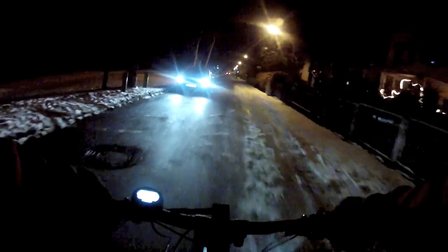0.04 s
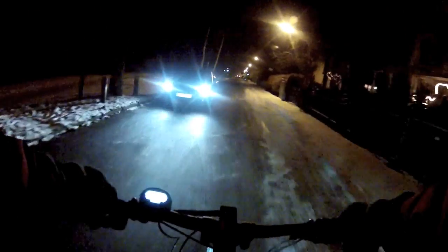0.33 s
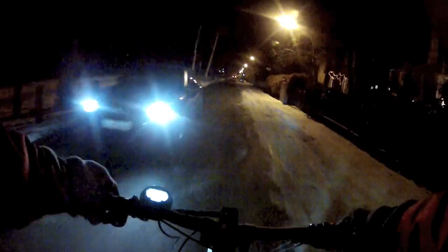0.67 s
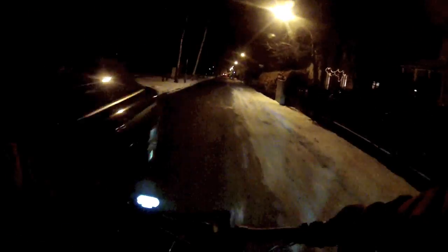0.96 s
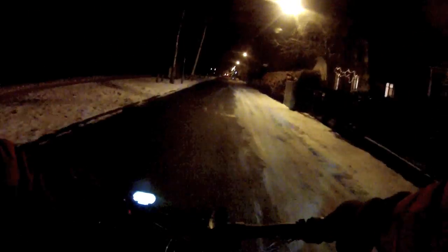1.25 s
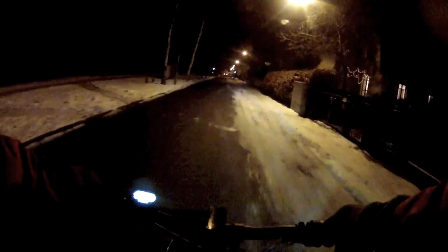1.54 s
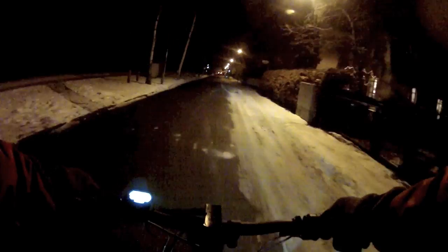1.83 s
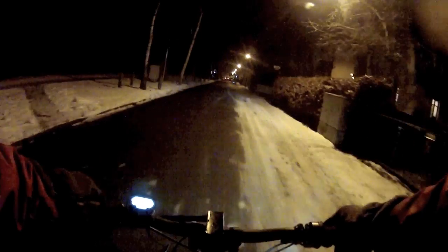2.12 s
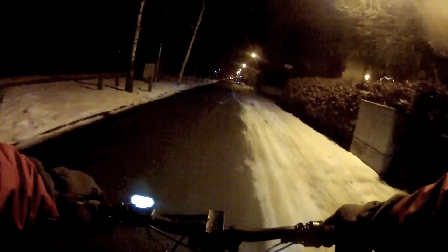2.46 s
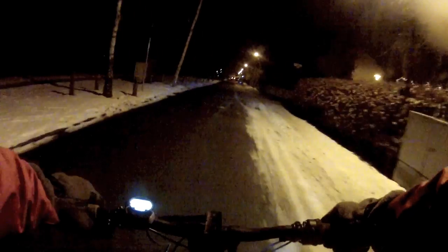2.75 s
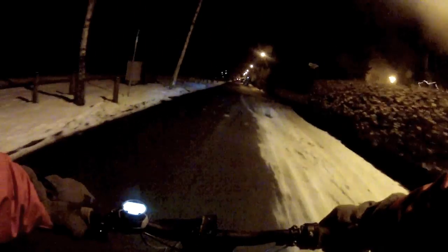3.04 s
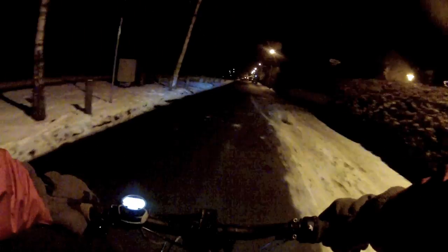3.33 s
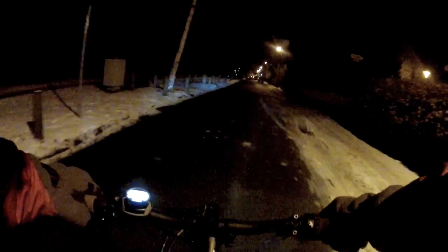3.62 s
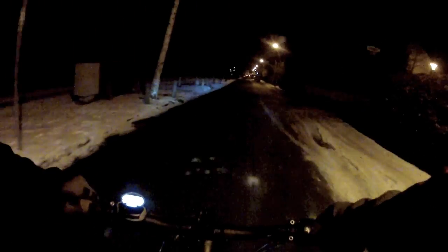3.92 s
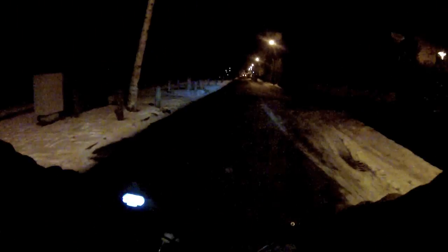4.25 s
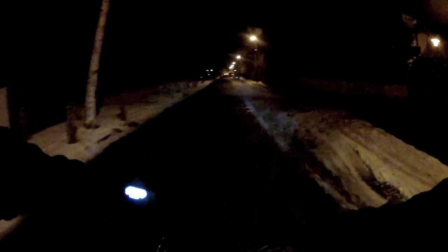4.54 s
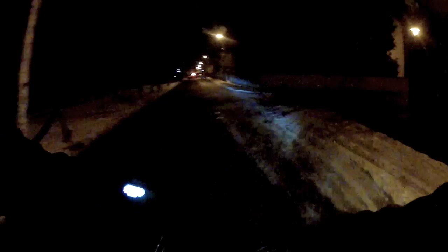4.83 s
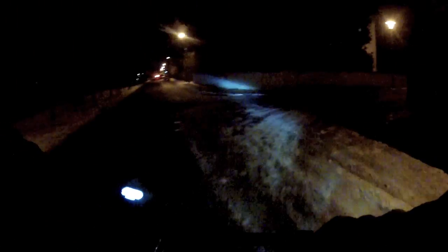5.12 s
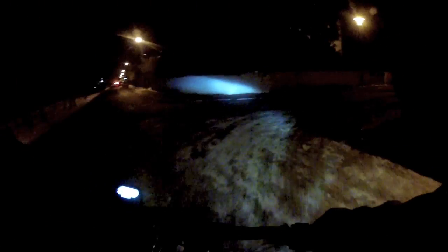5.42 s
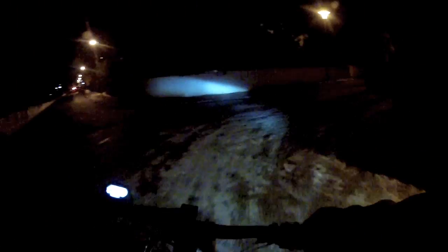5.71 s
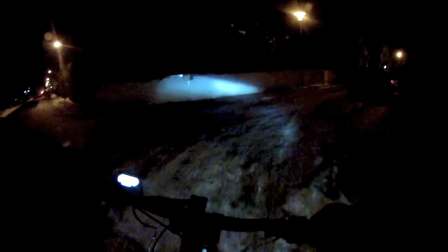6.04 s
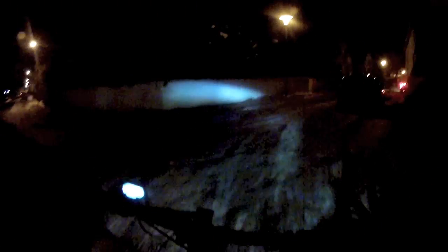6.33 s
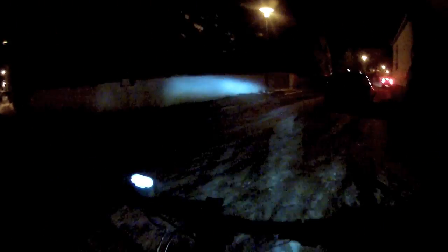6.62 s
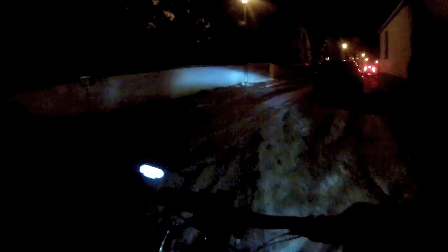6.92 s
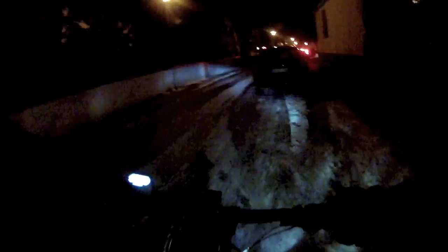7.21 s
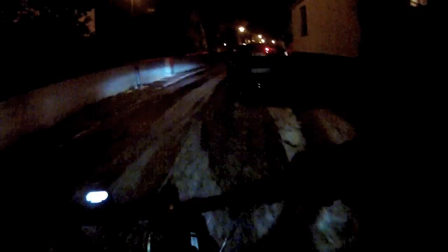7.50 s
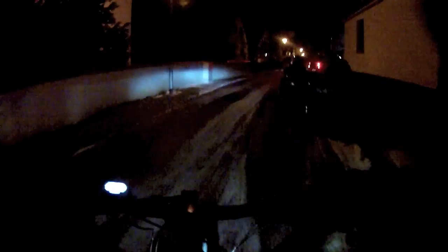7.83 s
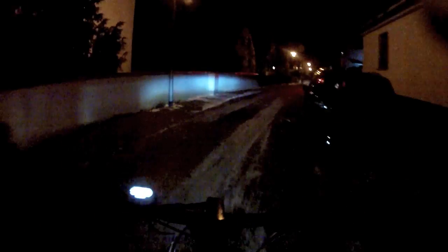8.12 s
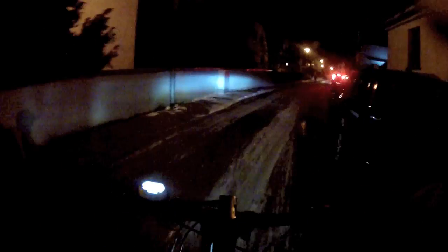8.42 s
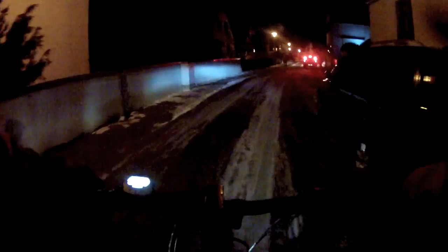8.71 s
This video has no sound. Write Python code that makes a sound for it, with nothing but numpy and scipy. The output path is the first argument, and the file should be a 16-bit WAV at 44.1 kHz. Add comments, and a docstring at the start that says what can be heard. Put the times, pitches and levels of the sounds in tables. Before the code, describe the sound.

From the start, studded bicycle tyres crackle close to the microphone on asphalt: fine bright ticks and irregular sharp snaps over a hollow rolling rush. Low wind buffets the microphone, gusting near 0.7 and 1.6 seconds, then easing. An oncoming car's tyre roar swells, peaks at about 1 second and falls away; its low engine drone follows, rises slightly in pitch and fades by about 4.5 seconds. Brief stud skids are scattered throughout. Around 5.5 to 7 seconds the bicycle slows onto ice, the snaps thin out and the crackle becomes a quieter, denser crunch. Frozen ruts knock dully against the tyres from 6 to 8 seconds, hardest after 7.3 seconds, where another gust comes. The tread hums briefly near 8.5 seconds, and a dull rumble wells up at about 8.8 seconds. A thin glassy fizz lies over the whole sound.

```python
"""A winter road: a bicycle on studded tyres rolls over asphalt, then slows onto rutted ice.
The studs crackle, snap and skid over the hollow rush of the tyres, and frozen ruts knock against them.
An oncoming car roars past in the first second and drones away. Wind buffets the microphone,
and a dull rumble wells up at the very end. A coarse sample-and-hold lays a glassy fizz over it all."""
import sys
import numpy as np
from scipy import signal
from scipy.fft import rfft, irfft
from scipy.io import wavfile

SR = 44100
rng = np.random.default_rng(int(sys.argv[2]) if len(sys.argv) > 2 else 0)


def output_pcm(signal):
    """Save a mono or channel-first signal as 16-bit PCM at the path in sys.argv[1].

    Samples are clipped to [-1, 1] before scaling.
    """
    pcm = np.clip(np.atleast_2d(signal).T, -1, 1) * 32767
    wavfile.write(sys.argv[1], SR, np.round(pcm).astype(np.int16))


N = 390726
TIME = np.arange(N) / SR
HOLD_HZ = 8000  # rate of the sample-and-hold

# The wind bed, easing as the bicycle slows. Each row: time in seconds, level in dB before gusts.
WIND_LEVEL = [(0, -32.5), (2.2, -37), (3.9, -38), (5, -44), (6.7, -45.5), (8.86, -42)]
# Gusts on top of that bed. Each row: centre in seconds, lift in dB.
WIND_GUSTS = [(0, 1.5), (.7, 4.5), (1.602, 5), (2.88, 1), (7.3, 5)]
# The car's engine picks up and eases off. Each row: time in seconds, firing rate in Hz.
ENGINE_FIRING = [(1.3, 54.76), (2.03, 55.44), (2.42, 65.75), (2.65, 64.8), (2.9, 68), (3.2, 64.8),
                 (3.6, 63.35), (4.15, 59.3)]
# How much of the road is ice. Each row: time in seconds, share from 0 to 1.
ICE_SHARE = [(0, 0), (5.2, 0.13), (5.9, 0.22), (6.8, 0.88), (7.9, 0.88), (8.8, 0.63)]
# Frozen ruts. Each row: time in seconds, relative knock peak in dB, relative shudder level in dB.
RUT_HITS = [(5.96, -24, -34), (6.17, -26, -33), (6.307, -19.5, -34.5), (6.535, -21, -34.5),
            (6.591, -16.5, -33.5), (6.984, -20, -33), (7.324, -15, -30), (7.478, -17, -42),
            (7.569, -13, -31.5), (7.721, -10.5, -40), (7.784, -15.5, -38), (7.937, -14, -32),
            (7.968, -21, -33)]
# How hard the road works the studs. Each row: time in seconds, relative crackle level in dB.
CRACKLE_LEVEL = [(0, -34), (.85, -36), (1.02, -32), (1.35, -35), (2.3, -35), (2.55, -33.5), (3.4, -33),
                 (4.05, -37), (4.4, -35.5), (5.2, -36.5), (5.6, -42), (6, -42), (6.55, -44.5),
                 (7.25, -33.5), (7.45, -38), (7.9, -39.5), (8.25, -44.5), (8.86, -42)]
# Short slides of a stud. Each row: start in seconds, length in seconds, relative level in dB.
STUD_SKIDS = [(1.609, 0.028, -25.5), (2.469, 0.037, -35), (3.328, 0.033, -30), (4.449, 0.052, -28.5),
              (5.72, .04, -34.5), (6.026, 0.021, -35), (6.289, 0.033, -35), (6.834, 0.11, -39),
              (7.028, 0.013, -29.5), (7.171, 0.017, -27), (7.8, 0.029, -35), (7.872, 0.034, -35.5),
              (8.159, 0.04, -41.5)]
# The loudest snaps on stone. Each row: start in seconds, relative attack level in dB, brightness in dB.
STUD_SNAPS = [(.0257, -20.5, 0), (.152, -20, -8), (.161, -20, -2), (0.2468, -23, -5), (0.3968, -21.5, 2),
              (0.5474, -20.5, 0), (.758, -21.5, 5), (.86, -21, 3), (1.02, -25, 10), (1.0249, -18, 2),
              (1.034, -24.5, 10), (1.1716, -22, 10), (1.478, -21.5, -1), (1.5807, -19.5, 3),
              (1.659, -18.5, -1), (1.817, -19, -5), (1.8223, -22.5, -1), (1.92, -17.5, 1.5),
              (1.9748, -19, -5), (2.2362, -21.5, 2), (2.4738, -28, 6), (2.5871, -23, 0), (2.6074, -23, 3),
              (2.8969, -22, 5), (2.9214, -21.5, -2), (2.976, -13, -2), (3.3164, -23, 15), (3.5216, -25, 9),
              (3.7005, -22, 8), (4.2951, -24, -2), (4.3629, -24, -2), (4.402, -21, 3), (4.596, -18.8, 3),
              (4.673, -23, -2), (5.068, -19, 3), (5.1355, -25, 2), (5.1863, -27.5, -2), (5.3027, -24.5, 3),
              (5.3569, -26.5, 5), (5.411, -26, 4), (5.4946, -24, 2), (5.5405, -26, 4), (5.7145, -24, -6.5),
              (6.311, -33.5, -22), (7.4454, -19, -17), (7.4597, -24, -7), (8.1728, -30.5, -14)]

# The tone colour of each source. Each row: frequency in Hz, relative level in dB.
WIND_COLOUR = [(10, -33), (28, -1), (50, -0.5), (110, -2), (180, -6), (300, -5.5), (600, -49), (2000, -78)]  # deep buffeting
CAR_COLOUR = [(40, -16), (150, -2), (230, 1.5), (400, -2), (520, -1), (700, -2), (900, -13.5), (1200, -16),
              (1700, -14), (3000, -14), (4000, -24.5)]  # the car's road roar
TYRE_ASPHALT_COLOUR = [(40, -6), (170, -14.5), (245, -9), (288, 1.5), (338, 1.5), (385, -8), (450, -8),
                       (520, -6.5), (605, -4.5), (720, -9), (850, -18), (1100, -28), (2000, -33),
                       (4000, -27.5)]  # the bicycle tyres' hollow rush
TYRE_ICE_COLOUR = [(40, -14.5), (170, -14), (245, -6.5), (305, 0.5), (365, -5.5), (440, -10.5), (520, -2.5),
                   (585, 0), (640, -4.5), (720, -5.5), (850, -17.5), (1100, -21.5), (2000, -20.5),
                   (4000, -61)]  # on ice their upper resonance comes forward
STUD_ASPHALT_COLOUR = [(150, -12), (620, -3), (1050, -13), (1550, -8), (2010, 4.5), (2180, -2), (2320, 4),
                       (2480, -6.5), (2690, 5), (2830, 2), (3000, 6.5), (3270, -5.5), (3750, -3),
                       (4000, -9.5)]  # a bright tick
STUD_ICE_COLOUR = [(150, -12.5), (620, 4.5), (1000, -7.5), (1550, -10.5), (1970, 1.5), (2300, 0.5),
                   (2600, -6), (2900, 3.5), (3100, -5), (3350, -5.5), (3700, -28), (4000, -9)]  # a fuller crunch


def gain_of(db):
    """Decibels to amplitude."""
    return 10 ** (np.asarray(db) / 20)


def unit_rms(x):
    """Scales to rms 1."""
    return x / np.sqrt(np.mean(x ** 2) + 1e-20)


def curve(rows):
    """A table of times and values, drawn out to every sample."""
    return np.interp(TIME, *np.transpose(rows))


def colour_db(colour, hz):
    """A tone colour's level at the given frequencies."""
    corner_hz, db = np.transpose(colour)
    return np.interp(np.log(hz + 1), np.log(corner_hz + 1), db)


def add(mix, start_s, sound):
    """Drops a sound into the mix."""
    part = mix[max(round(start_s * SR), 0):][:len(sound)]
    part += sound[:len(part)]


def swell(centre_s, width_s):
    """A smooth hump of height 1."""
    return np.exp(-.5 * ((TIME - centre_s) / width_s) ** 2)


def noise(colour):
    """Coloured noise of rms 1."""
    shape = gain_of(colour_db(colour, np.fft.rfftfreq(N, 1 / SR)))
    return unit_rms(irfft(rfft(rng.standard_normal(N)) * shape, N))


def wander(rate_hz):
    """Smooth random drift of rms 1, rolled off above the rate."""
    hz = np.fft.rfftfreq(N, 1 / SR)
    shape = np.exp(-(hz / rate_hz) ** 2) * (hz > 1)
    return unit_rms(irfft(rfft(rng.standard_normal(N)) * shape, N))


def ring(colour, bright_db=0, pivot_hz=2450, span_hz=450, size=4096):
    """The ring of one blow; a harder contact tips it towards the upper resonances."""
    hz = np.fft.rfftfreq(size, 1 / SR)
    db = colour_db(colour, hz) + bright_db / 2 * np.tanh((hz - pivot_hz) / span_hz)
    db -= 60 * np.clip(hz / (HOLD_HZ / 2) - 1, 0, 1)  # roll off the top
    log_gain = np.log(gain_of(np.r_[db, db[-2:0:-1]]))
    minimum_phase = np.exp(np.conj(signal.hilbert(log_gain)))
    response = np.fft.ifft(minimum_phase).real[:size // 2]
    return response / np.linalg.norm(response)


def blows(per_s, spread_db, cap_sigmas=2.27):
    """Random impulses of uneven strength."""
    strength = gain_of(spread_db * np.minimum(rng.standard_normal(N), cap_sigmas))
    return strength * rng.choice([-1, 1], N) * (rng.random(N) < per_s / SR)


def grains(colour, per_s, spread_db, bright_db):
    """A shower of clicks, shared evenly among the listed brightnesses."""
    showers = [signal.oaconvolve(blows(per_s / len(bright_db), spread_db), ring(colour, db))[:N]
               for db in bright_db]
    return unit_rms(sum(showers))


def frame_smear(x, centre_hz=2330, width_hz=1200):
    """An all-pass: the frame carries a blow's pitches at unequal speeds, which rounds its peak."""
    radius = np.exp(-np.pi * width_hz / SR)
    poles = [1, -2 * radius * np.cos(2 * np.pi * centre_hz / SR), radius ** 2]
    return signal.lfilter(poles[::-1], poles, x)


def wind():
    """Lumpy low buffeting on the microphone, with a few longer gusts."""
    lumps_db = 1.2 * wander(rate_hz=12)
    gusts_db = sum(db * swell(s, width_s=.12) for s, db in WIND_GUSTS)
    return gain_of(curve(WIND_LEVEL) + gusts_db + lumps_db) * noise(WIND_COLOUR)


def rumble(start_s=8.78, fade_in_s=.05, level_db=-31):
    """A dull rumble wells up."""
    # Each pair: frequency in Hz, relative level in dB.
    colour = [(40, -18), (90, -12), (140, -1), (200, -2.5), (320, -4), (420, 0), (600, -24), (1200, -42)]
    return gain_of(level_db) * np.clip((TIME - start_s) / fade_in_s, 0, 1) * noise(colour)


def car_tyres(nearest_s=.95, approach_s=.42, leave_s=.28, level_db=-26):
    """Road roar that swells and falls as one over the car's distance."""
    away = (TIME - nearest_s) / np.where(TIME < nearest_s, approach_s, leave_s)
    return gain_of(level_db) * noise(CAR_COLOUR) / np.hypot(1, away)


def car_engine(drone_s=1.35, lift_off_s=3.88, dip_at_s=1.81, dip_every_s=1.09, hum_s=3.95):
    """The exhaust drones behind the car until the driver lifts off; a higher hum swells and sinks."""
    firing_hz = curve(ENGINE_FIRING)
    since_s = TIME - drone_s
    fade_in_db = 70 * np.minimum(since_s, 0)
    distance_db = -1.9 * since_s
    lift_off_db = -40 * np.maximum(TIME - lift_off_s, 0)
    drone_db = -31.5 + fade_in_db + distance_db + lift_off_db
    from_dip_s = (TIME - dip_at_s + dip_every_s / 2) % dip_every_s - dip_every_s / 2
    first_db = drone_db - 11 * np.exp(-(from_dip_s / .12) ** 2)  # the fundamental dips at even intervals
    second_db = drone_db - 9 + .59 * (firing_hz - firing_hz[0])  # the overtones grow with the revs
    hum_hz = 160.5 - 32 * (TIME - hum_s)
    hum_db = -40 - 19 * abs(TIME - hum_s)
    partials = [(firing_hz, first_db), (2 * firing_hz, second_db), (3 * firing_hz, second_db - 13.5),
                (hum_hz, hum_db)]
    pitch_drift = 1 + .003 * wander(rate_hz=10)
    out = np.zeros(N)
    for hz, db in partials:
        waver_db = .6 * wander(rate_hz=8)
        phase = 2 * np.pi * np.cumsum(hz * pitch_drift) / SR
        out += gain_of(db + waver_db) * np.sqrt(2) * np.sin(phase)
    return out


def tread_hum(centre_s=8.52, pitch_hz=585, rise_hz_per_s=70, level_db=-40):
    """On smooth ice the tread hums one brief, fuzzy note that rises a little."""
    phase = 2 * np.pi * np.cumsum(pitch_hz + rise_hz_per_s * (TIME - centre_s)) / SR
    fuzzy_note = wander(rate_hz=30) * np.cos(phase) + wander(rate_hz=30) * np.sin(phase)
    return gain_of(level_db) * swell(centre_s, width_s=.12) * fuzzy_note


def bicycle_tyres(ice_boost_db=1.6, shudder_s=.033):
    """The road drums on the hollow tyres: an even rush on asphalt, lumpy on ice, shuddering at ruts."""
    ice = curve(ICE_SHARE)
    lumps = grains(TYRE_ICE_COLOUR, per_s=1100, spread_db=3, bright_db=[-6.5])
    rush = np.sqrt(1 - ice) * noise(TYRE_ASPHALT_COLOUR) + np.sqrt(ice) * lumps
    follow_db = .82 * (curve(CRACKLE_LEVEL) + 34)  # the rush rides up and down with the crackle
    rolling = gain_of(-30.5 + follow_db + ice_boost_db * ice)
    shudder_power = sum(gain_of(db) ** 2 * swell(s, shudder_s) for s, _, db in RUT_HITS)
    waver = gain_of(.94 * wander(rate_hz=9.8))
    return np.sqrt(rolling ** 2 + shudder_power) * waver * rush


def rut_knocks(trim_db=-2, rattle_s=.0044, size=1024):
    """A ridge of ice knocks the tyre, which rings briefly."""
    # Each pair: frequency in Hz, relative level in dB.
    colour = [(60, -28), (200, -13), (300, -7), (430, -2), (590, -1.5), (720, 1.5), (900, -27),
              (2000, -20), (4000, -42)]
    body = frame_smear(ring(colour), centre_hz=600, width_hz=470)
    out, t = np.zeros(N), np.arange(size) / SR
    for start_s, db, _ in RUT_HITS:
        rattle = .13 * rng.standard_normal(size) * np.exp(-t / rattle_s)
        thud = np.convolve((t == 0) + rattle, body)
        add(out, start_s, gain_of(db + trim_db) * thud / abs(thud).max())
    return out


def stud_skids(trim_db=1):
    """A sliding stud chatters: a short, dense burst of grains."""
    bursts = np.zeros(N)
    for start_s, length_s, db in STUD_SKIDS:
        add(bursts, start_s, gain_of(db + trim_db) * signal.windows.tukey(round(length_s * SR), .4))
    chatter = grains(STUD_ASPHALT_COLOUR, per_s=1900, spread_db=2, bright_db=np.linspace(6.5, -6.5, 5))
    return bursts * chatter


def stray_snaps(per_s=16, lift_db=5.5, bright_spread_db=9, candidates=300):
    """Lesser snaps at random on bare asphalt, as rows like STUD_SNAPS; ice puts an end to them."""
    position, luck = rng.random((candidates, 2)).T
    bright_db = bright_spread_db * rng.standard_normal(candidates)
    at = (position * N).astype(int)
    bare = 1 - np.clip(2 * curve(ICE_SHARE)[at], 0, 1)
    rows = np.transpose([TIME[at], curve(CRACKLE_LEVEL)[at] + lift_db, bright_db])
    return list(rows[luck < bare * per_s * N / SR / candidates])


def stud_snaps(trim_db=1.5, attack_s=.004, scrape_s=.0013, size=256):
    """A stud slips off a stone: one sharp blow and a brief scrape."""
    out, t = np.zeros(N), np.arange(size) / SR
    for start_s, db, bright_db in STUD_SNAPS + stray_snaps():
        scrape = .05 * rng.standard_normal(size) * np.exp(-t / scrape_s)
        click = np.convolve((t == 0) + scrape, ring(STUD_ASPHALT_COLOUR, bright_db))
        attack_rms = np.std(click[:round(attack_s * SR)])
        add(out, start_s, gain_of(db + trim_db) * click / attack_rms)
    return out


def stud_crackle():
    """Studs tick on asphalt and crunch more densely in ice, in clumps as the surface varies."""
    ice = curve(ICE_SHARE)
    ticks = grains(STUD_ASPHALT_COLOUR, per_s=800, spread_db=6, bright_db=np.linspace(-6, 6, 5))
    ticks += gain_of(-2) * noise(STUD_ASPHALT_COLOUR)
    crunch = grains(STUD_ICE_COLOUR, per_s=3600, spread_db=5, bright_db=np.linspace(-2.5, 2.5, 5))
    patches = gain_of(1.5 * wander(rate_hz=60))
    clumps = gain_of(1.7 * wander(rate_hz=50))
    on_asphalt = gain_of(3) * unit_rms(ticks * patches)
    on_ice = gain_of(.5) * unit_rms(crunch * clumps)
    return gain_of(curve(CRACKLE_LEVEL)) * (np.sqrt(1 - ice) * on_asphalt + np.sqrt(ice) * on_ice)


def scene():
    """The mono mix: bicycle in front, with car, wind and rumble behind it."""
    studs = frame_smear(stud_crackle() + stud_snaps() + stud_skids())
    bicycle = studs + bicycle_tyres() + tread_hum() + rut_knocks()
    return (bicycle + car_tyres() + car_engine() + wind() + rumble())[None]


def record(dry, repeats=6, top_hz=14500):
    """Coarse samples held as steps mirror the sound into the treble as glassy fizz, under a high cut."""
    coarse = signal.resample_poly(dry, HOLD_HZ, SR, axis=1, window=("kaiser", 5))
    coarse = signal.oaconvolve(coarse, signal.firwin(61, 3930, fs=HOLD_HZ)[None], "same")
    steps = np.repeat(coarse, repeats, axis=1)
    fizzy = signal.resample_poly(steps, SR, repeats * HOLD_HZ, axis=1)[:, :N]
    high_cut = signal.firwin(101, top_hz, window=("kaiser", 8), fs=SR)
    return signal.oaconvolve(fizzy, high_cut[None], "same")


dry = scene()
out = record(dry)
output_pcm(out)
```